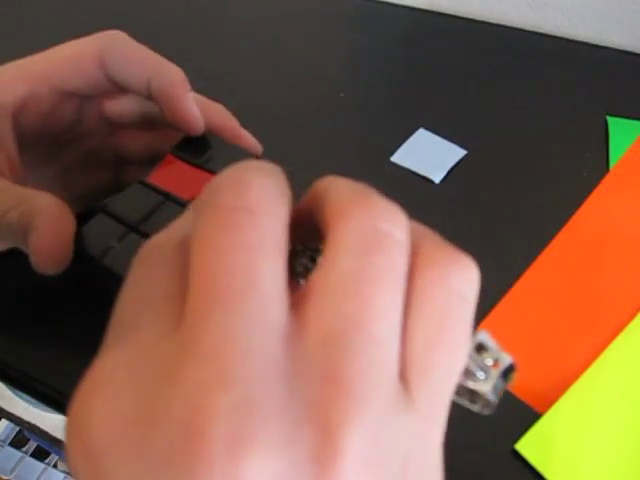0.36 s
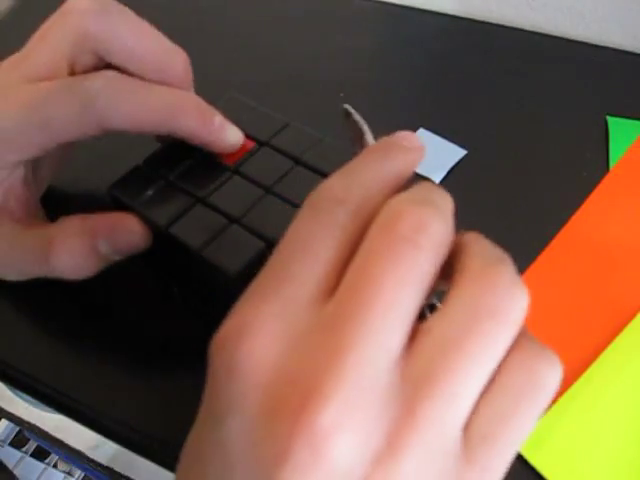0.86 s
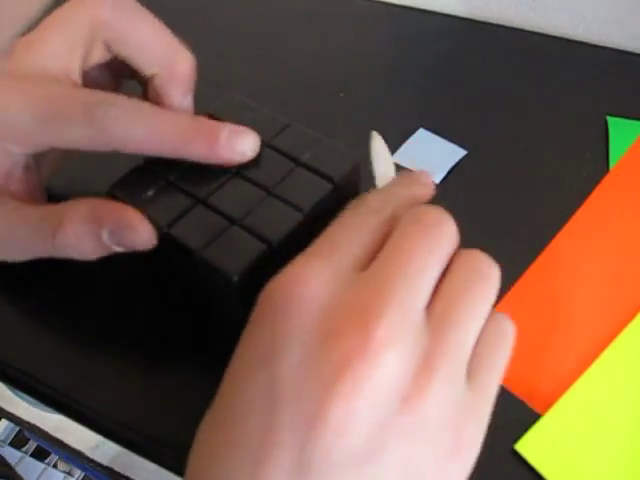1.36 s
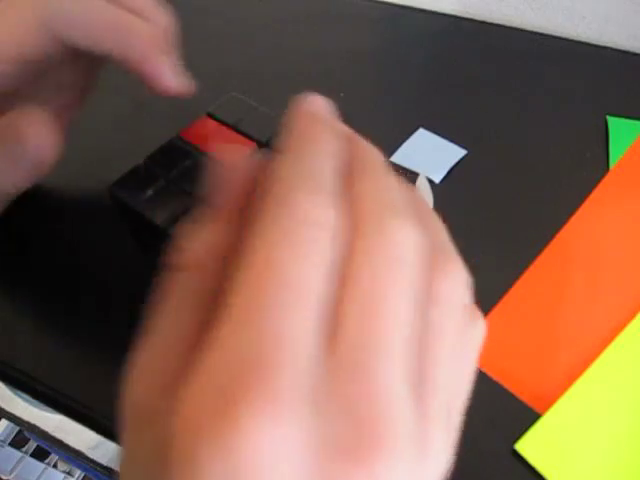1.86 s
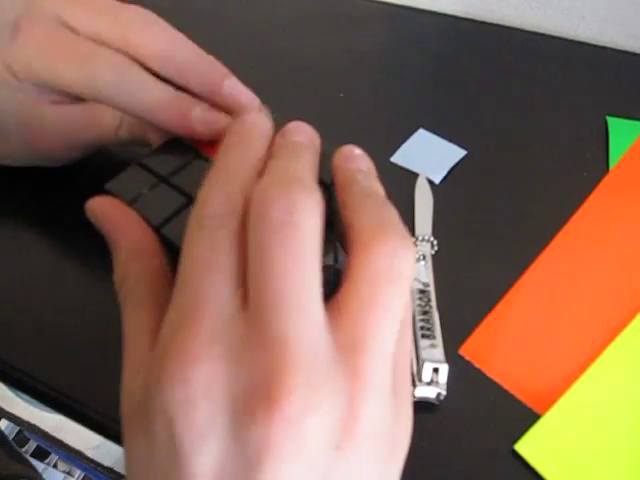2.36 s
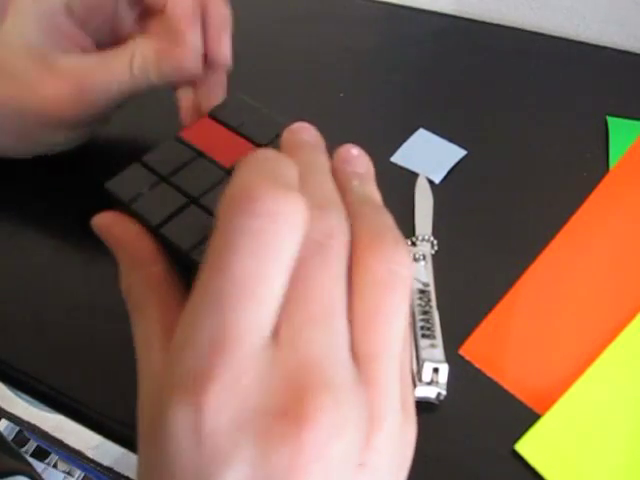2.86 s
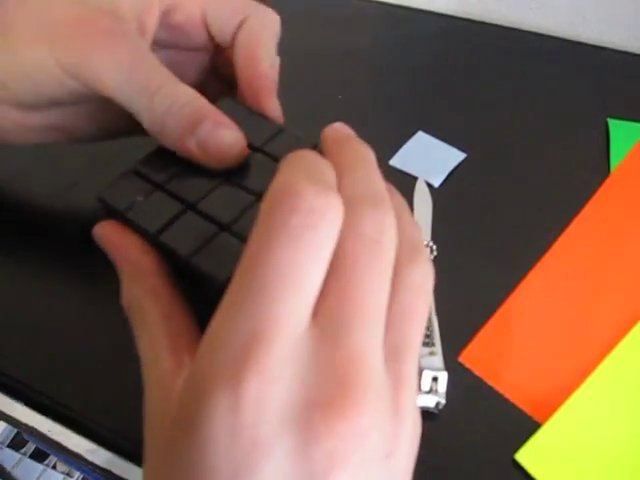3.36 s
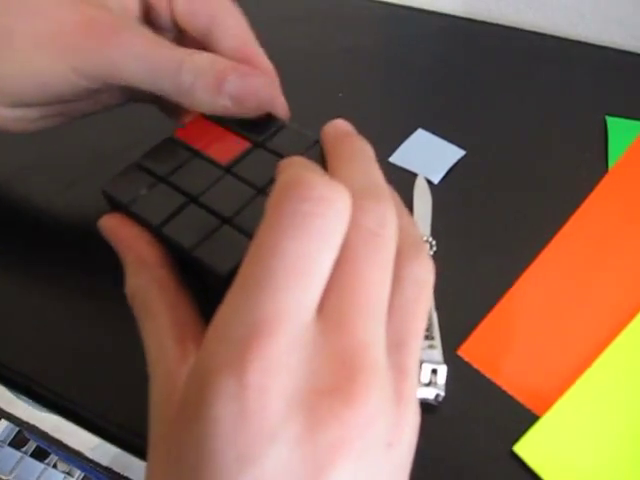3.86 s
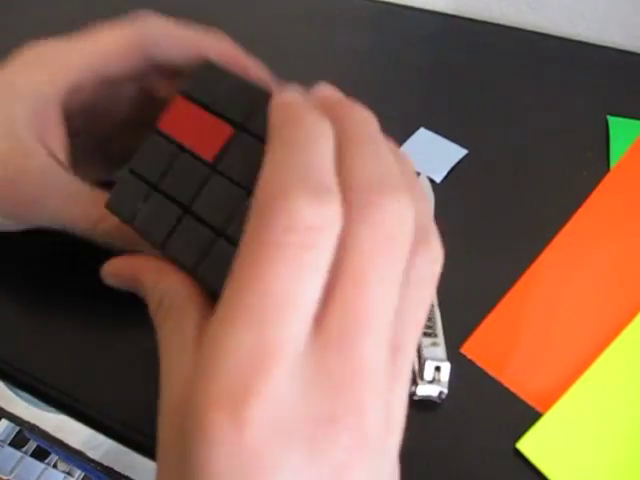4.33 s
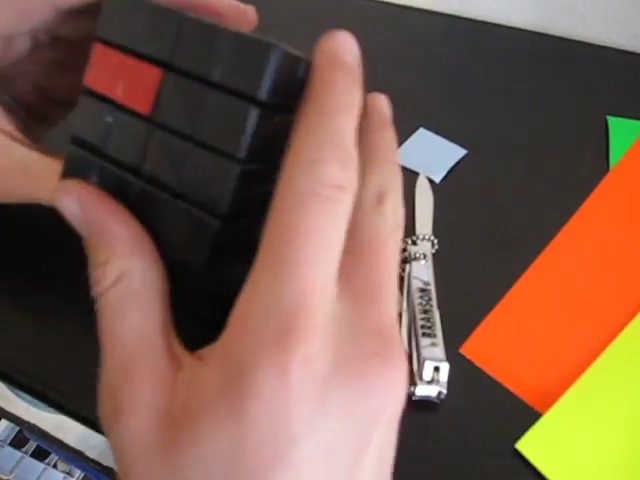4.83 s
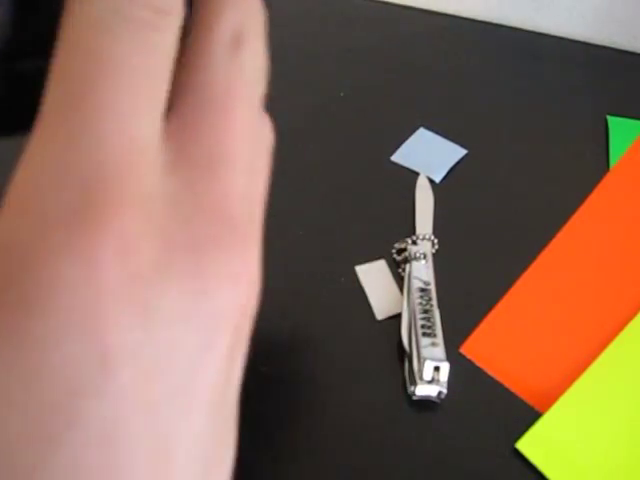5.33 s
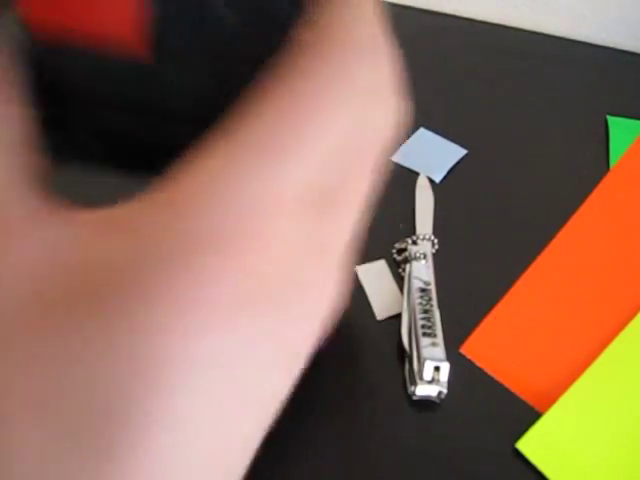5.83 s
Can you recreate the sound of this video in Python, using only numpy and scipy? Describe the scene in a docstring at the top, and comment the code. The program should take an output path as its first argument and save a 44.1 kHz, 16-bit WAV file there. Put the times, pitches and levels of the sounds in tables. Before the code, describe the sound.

A close, dry-sounding desk scene in a small room, with a steady faint hiss. From 0 to 0.7 s hands rest on a hollow plastic puzzle cube, giving only tiny ticks. Around 0.75-0.85 s a small cluster of plastic clicks and a brief scrape follow, then sparse faint touches. At 1.44 s a steel nail clipper drops on the desk with a loud, hard clack, by far the loudest event; it bounces at about 1.51 and 1.59 s, with short bright bead-chain crackle, settling by 1.75 s. From 1.85 to 2.3 s the cube drags softly. Light irregular ticks and knocks continue to about 4.2 s, with low thuds and scuffs near 3.3-3.5 s as fingers press and rub a sticker. From 3.9 to 5.2 s skin friction grows airy, stuttering briefly near 4.7 s. Then almost only hiss remains, with one barely audible touch near 5.9 s.

```python
"""First a faint hiss of room and microphone under resting hands; then a plastic puzzle cube ticks and knocks,
drags over a desk top and is rubbed by fingers that press a sticker onto it, close to a small microphone.
Once a steel nail clipper with a bead chain is dropped on the desk and bounces. Impacts and small slips
excite damped modes of desk, hollow body and hard faces; skin friction and hiss are shaped noise."""
import sys
import numpy as np
from scipy import signal
from scipy.fft import rfft, irfft
from scipy.io import wavfile
from scipy.ndimage import uniform_filter1d

SR = 44100
rng = np.random.default_rng(int(sys.argv[2]) if len(sys.argv) > 2 else 0)


def to_linear_factor(level_db):
    """Convert decibel levels (scalar or array-like) to linear amplitude factors."""
    exponent = np.asarray(level_db, float) / 20
    return 10 ** exponent


def unload_wav(signal):
    """Save mono or channel-first audio to the path in sys.argv[1] as 16-bit WAV at rate SR, clipped to [-1, 1]."""
    wavfile.write(
        sys.argv[1],
        SR,
        np.round(np.clip(np.atleast_2d(signal).T, -1, 1) * 32767).astype(np.int16),
    )


N = 262650   # length in samples


def rms_one(x):
    """Power normalisation: scales a signal to rms 1."""
    return x / np.sqrt(np.mean(x ** 2) + 1e-20)


def coloured(spectrum):
    """Spectral shaping: white noise filtered to a given power density gives steady noise, here of rms 1."""
    hz, db = np.transpose(spectrum)
    bin_hz = np.arange(N // 2 + 1) * SR / N + 1   # 1 Hz up, to keep the logarithm finite
    gain = to_linear_factor(np.interp(np.log(bin_hz), np.log(hz), db))
    return rms_one(irfft(rfft(rng.standard_normal(N)) * gain, N))


def drift(rate):
    """Slow random modulation: chance values, rate per second, joined by lines; spread 1."""
    knots = rng.standard_normal(400)
    return np.interp(np.arange(N) / SR * rate, np.arange(400), knots) * np.sqrt(3 / 2)


def band(x, low_hz, high_hz):
    """Band limitation: a second-order Butterworth band-pass."""
    return signal.sosfilt(signal.butter(2, [low_hz, high_hz], "band", fs=SR, output="sos"), x)


def evened(x, over_s):
    """Steady pressure: dividing by the short-time rms keeps the level even."""
    return x / np.sqrt(uniform_filter1d(x ** 2, int(over_s * SR)) + 1e-12)


def ring(force, hz, t60):
    """Damped resonance: a force sets one mode ringing, which falls 60 dB in t60 seconds."""
    radius = to_linear_factor(-60 / (t60 * SR))
    w = 2 * np.pi * hz / SR
    return signal.lfilter([0, np.sin(w)], [1, -2 * radius * np.cos(w), radius * radius], force + 1e-18)


def ring_all(force, modes, column):
    """Modal superposition: one force drives a whole table, at the levels of one column, signs alternating."""
    return sum((-1) ** k * to_linear_factor(mode[column]) * ring(force, mode[0], mode[-1])
               for k, mode in enumerate(modes))


def slips(per_s, size_db):
    """Friction as a Poisson-like train: random slips of either sign and uneven size."""
    sizes = to_linear_factor(size_db * np.minimum(rng.exponential(1, N), 4)) * rng.choice([-1, 1], N)
    return sizes * (rng.random(N) < per_s / SR)


def swells(rows, swell, lean):
    """Power addition of gestures: each swells and fades; one envelope per level column."""
    start, length, *levels_db = np.transpose(rows)[:, :, None]
    coarse = np.arange(0, N, 32)
    done = np.clip((coarse / SR - start) / length, 0, 1)
    shape = np.abs(np.sin(np.pi * done ** lean)) ** swell
    slow = [np.sqrt(np.sum((to_linear_factor(db) * shape) ** 2, axis=0)) for db in levels_db]
    return [np.interp(np.arange(N), coarse, envelope) for envelope in slow]


def during_clipper(t):
    """Change of source: marks the times in seconds at which the steel clipper and chain sound."""
    return (t > 1.43) & (t < 1.76)


# Hiss of room and microphone. Each row: frequency in Hz, relative density in dB per Hz.
AIR_SPECTRUM = [(15, -35), (25, -3), (91, -6), (315, -8.5), (402, 0), (460, -4), (727, -1), (1180, -9),
                (1460, -11), (2440, -12), (15700, -24)]
AIR_DB = -54.5


def air():
    """Stationary background noise: its spectrum alone gives the hiss its colour."""
    return to_linear_factor(AIR_DB) * coloured(AIR_SPECTRUM)


# Skin sliding on plastic. Each row: frequency in Hz, relative density in dB per Hz.
SKIN_SPECTRUM = [(1500, -4), (3000, 1), (5000, -1.5), (7200, 0), (11000, 1), (13500, -5.5), (15700, -15)]


def skin_hiss():
    """Sliding and stick-slip friction: a wavering fine hiss breaks into puffs while the palm stutters."""
    start_s, end_s, slips_per_s, depth_db = 4.61, 4.77, 28.0, 10.0
    t = np.arange(N) / SR
    stuttering = (t > start_s - .5 / slips_per_s) * (t < end_s)
    stuck = stuttering * np.cos(np.pi * slips_per_s * (t - start_s)) ** 4
    waver_db = 1.2 * drift(60.0)
    return to_linear_factor(waver_db - depth_db * stuck) * coloured(SKIN_SPECTRUM)


# Modes of hard faces meeting. Each row: frequency in Hz, relative level in dB, t60 in seconds.
FACE_MODES = [(3500, 23.5, 0.00074), (5270, 15, 0.0033), (5780, 12, 0.0028), (8300, 16.5, 0.00098),
              (10900, 14.5, 0.0017), (12760, 3.5, 0.0049), (14360, 0, 0.0036)]


def chain_crackle():
    """Excitation by dense small slips: the bead chain rings high modes and crackles."""
    ringing = ring_all(slips(1800.0, 2.5), FACE_MODES, column=1)
    return evened(band(ringing, 6700, 14000), 0.022)


# Strokes of skin, or of the chain. Each row: start in seconds, length in seconds, level in dB.
STROKES = [(0.15, 0.3, -66.5), (0.6, 1, -70), (1.45, 0.15, -44), (1.57, 0.088, -32.5), (1.64, 0.18, -54),
           (1.85, 0.19, -52), (2.0, 0.32, -53), (2.76, .12, -55), (2.91, 0.27, -53), (3.15, 0.37, -52),
           (3.45, 0.3, -61), (3.92, 0.25, -50.5), (4.09, .13, -45.5), (4.22, .09, -47.5), (4.3, .11, -49),
           (4.38, .82, -48.5)]
STROKE_SWELL, STROKE_LEAN = 1.15, 1   # roundness of a stroke; a lean of 1 peaks midway
RESTING_SKIN_DB = -65.5


def rub():
    """Amplitude modulation by the stroke: it swells the skin's hiss, or the falling chain's crackle."""
    stroke, = swells(STROKES, STROKE_SWELL, STROKE_LEAN)
    level = np.hypot(stroke, to_linear_factor(RESTING_SKIN_DB))
    chain = chain_crackle()
    return level * np.where(during_clipper(np.arange(N) / SR), chain, skin_hiss())


# Modes of the desk top. Each row: frequency in Hz, relative level in dB under the cube,
# relative level in dB under the clipper, t60 in seconds.
DESK_MODES = [(175, -6, -28, .04), (240, -3, -26, .04), (340, -6, -20, .03), (475, -10, -13, .045),
              (538, -6, -16, .055), (650, -7, -5, .014), (765, -5, 0, .022), (880, -4, -1, .016),
              (1017, -4, -2, .016)]
# Modes of the hollow plastic body. Each row: frequency in Hz, relative level in dB, t60 in seconds.
BODY_MODES = [(1220, 13.5, 0.0088), (1413, -4, 0.12), (1590, 10, 0.0093), (1949, 1, 0.033),
              (2140, 8, 0.0092), (2960, 5.5, 0.006)]
# Things slide on the desk. Each row: start in seconds, length in seconds, pressure thud in dB,
# desk rumble in dB, body rattle in dB.
SLIDES = [(0.74, 0.2, -57, -48, -59), (1.445, 0.17, -56, -36.5, -39), (1.57, 0.2, -58, -36.5, -38.5),
          (1.84, 0.16, -56, -40, -44.5), (2.0, 0.32, -57, -40.5, -42), (2.27, 0.33, -58, -52.5, -55),
          (2.48, 0.46, -68, -55, -56), (3.05, 0.078, -53, -50, -51.5), (3.2, 0.19, -61, -44.5, -47),
          (3.26, 0.21, -41.5, -38, -45), (3.49, 0.18, -44, -48.5, -49.5), (3.62, 0.36, -63, -53.5, -56),
          (3.97, 0.22, -57.5, -49, -51.5), (4.13, .16, -58, -52.5, -54), (4.29, 0.11, -50.5, -55, -53.5)]
SLIDE_SWELL, SLIDE_LEAN = 0.57, 0.82   # roundness of a slide; a lean under 1 peaks early
RESTING_THUD_DB, RESTING_RATTLE_DB = -60.5, -61.5   # hands that only hold the cube


def drag():
    """Friction-driven resonance: small slips ring the desk, the body and its faces; pressure thuds below."""
    press, rumble, rattle = swells(SLIDES, SLIDE_SWELL, SLIDE_LEAN)
    force = slips(500.0, 3.0)
    span_s = .04
    thud = evened(band(force, 85, 290), span_s)
    under_cube = evened(band(ring_all(force, DESK_MODES, column=1), 300, 1150), span_s)
    under_clipper = evened(band(ring_all(force, DESK_MODES, column=2), 350, 1200), span_s)
    desk = np.where(during_clipper(np.arange(N) / SR), under_clipper, under_cube)
    body = evened(band(ring_all(force, BODY_MODES, column=1), 860, 5400), span_s)
    grit = to_linear_factor(-8.5) * evened(band(ring_all(force, FACE_MODES, column=1), 1800, 8900), span_s)
    thud_level = np.hypot(press, to_linear_factor(RESTING_THUD_DB))
    rattle_level = np.hypot(rattle, to_linear_factor(RESTING_RATTLE_DB))
    return thud_level * thud + rumble * desk + rattle_level * (body + grit)


def fidgets():
    """Random arrivals: faint touches at chance moments while the hands are busy, in rows like TOUCHES."""
    count, spread_db = 24, 3.0
    s = rng.uniform(1.0, 4.5, (count, 1))
    mean_db = (-58, -52, -53)   # knock, body, tick
    return np.hstack([s, mean_db + spread_db * rng.standard_normal((count, 3))])


def blows(modes_db, hz, t60s, edges_hz, rise_s, chatter_s, settle_s, settle_db, first=0):
    """Impact excitation, a row per touch: chatter strikes every mode, loose parts settle; loudest at rms 1."""
    t = np.arange(4400) / SR
    count = len(rise_s)
    lengths = chatter_s * to_linear_factor(rng.normal(0, 1.5, (count, 1)))
    chatter = np.exp(-t / lengths) * (1 - np.exp(-t / rise_s))
    settling = to_linear_factor(settle_db) * np.exp(-t / settle_s) * (1 - np.exp(-t / chatter_s))
    force = rng.standard_normal((count, len(t))) * (chatter + settling)
    force[:, [44]] += first   # one sharp contact 1 ms in
    strengths = to_linear_factor(modes_db + 2.5 * rng.standard_normal((count, len(hz))))
    out = sum((-1) ** k * strengths[:, [k]] * ring(force, hz[k], t60s[k]) for k in range(len(hz)))
    out = band(out, *edges_hz)   # small bodies radiate little outside their modes
    power = uniform_filter1d(out ** 2, int(chatter_s * SR * 2), axis=1)
    return out / np.sqrt(power.max(axis=1, keepdims=True))


# The clear touches. Each row: time in seconds, desk knock in dB, hollow body in dB, tick in dB.
TOUCHES = [(0.152, -52, -44, -44), (0.2809, -59, -48.0, -42), (0.2892, -52.0, -50, -33.5),
           (0.447, -67, -57, -40.5), (0.4644, -46, -43.5, -35), (0.538, -47, -43.5, -40.5),
           (0.5481, -53, -42.5, -37.0), (0.7394, -54, -43, -40.5), (0.7704, -38, -31, -31),
           (0.7788, -38, -39, -32.5), (0.7895, -43, -36, -41), (0.8279, -38, -31, -37),
           (1.0634, -41, -44.5, -59), (1.1621, -43, -40.5, -41.5), (1.2834, -55, -51, -44),
           (1.3474, -50, -40, -39), (1.3806, -48, -41, -41.5), (1.4406, -10, -12.5, -17),
           (1.4845, -27, -51, -26.5), (1.5128, -14, -17.5, -31.0), (1.5416, -37, -33, -36),
           (1.583, -24.5, -33, -37), (1.5941, -21, -14, -10), (1.6115, -28, -21, -36),
           (1.6303, -21.5, -19, -43), (1.665, -25, -28.5, -46), (1.7198, -43, -39, -43),
           (1.7249, -27, -28.5, -30), (1.8502, -31, -37.5, -42), (1.8821, -28, -33, -47),
           (1.9375, -38.5, -32, -56), (1.9517, -31, -47, -41), (2.0158, -43, -36, -28),
           (2.0668, -55, -36, -42), (2.3659, -43, -44, -40), (2.437, -40, -41.5, -49),
           (2.5046, -44, -39, -35), (2.5173, -41.5, -38, -42.5), (2.5455, -38, -29.5, -32),
           (2.5595, -56, -37.5, -35), (2.641, -40, -43, -45), (2.696, -59, -38.5, -41.5),
           (2.7577, -45, -42, -47.5), (2.821, -30.5, -30.5, -28.5), (2.8272, -34, -30, -33.5),
           (2.9306, -46.5, -51, -44), (3.1561, -43, -38, -35.5), (3.2337, -56, -48, -36.5),
           (3.2423, -42, -33, -42), (3.3132, -33.5, -41, -46), (3.327, -27.5, -46, -40.5),
           (3.3395, -30.5, -45, -43), (3.3544, -30, -50, -40), (3.417, -30.5, -53, -38),
           (3.4419, -36, -42.5, -40.5), (3.5052, -44, -46, -41.5), (3.5283, -39, -43, -39.5),
           (3.5601, -36, -37, -38.5), (3.5975, -35, -44, -39), (3.6291, -55, -30.5, -26),
           (3.7119, -52, -39, -36.5), (3.724, -41, -44, -52), (3.7583, -38, -41.5, -38.5),
           (3.7812, -44, -45, -41.5), (3.8424, -39, -32.5, -44.5), (3.888, -42, -45, -52),
           (3.9871, -41, -41, -41.5), (4.046, -35, -32.5, -32), (4.053, -36, -37, -33.5),
           (4.0716, -46, -38, -35), (4.1634, -45, -47, -36), (4.1788, -36, -37.5, -39),
           (4.308, -39, -48, -50), (4.3292, -35, -41, -47), (4.3939, -57, -40.5, -51),
           (4.494, -54, -51, -45), (4.7235, -44.5, -42.5, -42.5), (4.7665, -44, -63, -45),
           (4.9181, -46, -37.5, -35.5), (5.8806, -56, -47.5, -60)]
# The more the body outweighs the desk, the higher the desk modes struck under the cube.
KNOCK_TILT = 0.37        # dB per octave per dB
KNOCK_EVEN_DB = -15.5    # body-over-desk level at which there is no tilt
FIRST_CONTACT_DB = 15.5  # single sharp first contact of steel, over the chatter


def touches():
    """Modal impact: each touch is a knock in the desk, a clack of the body and a tick of the faces."""
    s, knock_db, body_db, tick_db = np.vstack([TOUCHES, fidgets()]).T[:, :, None]
    steel = during_clipper(s)
    rise_s = np.where(steel, .0002, .001)   # steel meets the desk more abruptly than plastic in a hand
    first = steel * to_linear_factor(FIRST_CONTACT_DB)

    hz, cube_db, clipper_db, t60 = np.transpose(DESK_MODES)
    tilt_db = np.clip(KNOCK_TILT * (body_db - knock_db - KNOCK_EVEN_DB), -2.0, 6.0)
    cube_db = cube_db + tilt_db * np.log2(hz / hz[0])
    desk_db = np.where(steel, clipper_db, cube_db)
    rows = to_linear_factor(knock_db) * blows(desk_db, hz, t60, (140, 1500), rise_s, chatter_s=.002,
                                 settle_s=.02, settle_db=-21, first=first)
    hz, db, t60 = np.transpose(BODY_MODES)
    rows += to_linear_factor(body_db) * blows(db, hz, t60, (900, 4000), rise_s, chatter_s=.0012,
                                 settle_s=.011, settle_db=-11.0, first=first)
    hz, db, t60 = np.transpose(FACE_MODES)
    rows += to_linear_factor(tick_db) * blows(db, hz, t60, (3000, 16000), np.full_like(s, .001), chatter_s=.0015,
                                 settle_s=.0047, settle_db=-12.0)

    out = np.zeros(N + rows.shape[1])
    starts = np.round((s[:, 0] - .001) * SR).astype(int)   # each row begins 1 ms ahead of its touch
    for at, row in zip(starts, rows):
        out[at:at + len(row)] += row
    return out[:N]


def room(x, t60_s, dull_hz):
    """Diffuse reverberation: near walls answer with a short decaying noise tail."""
    t = np.arange(int(.3 * SR)) / SR
    tail = rng.standard_normal(len(t)) * to_linear_factor(-60 * t / t60_s) * (t > .004)
    tail = signal.lfilter(*signal.butter(1, dull_hz, fs=SR), tail)
    return signal.fftconvolve(x, tail / np.sqrt(np.sum(tail ** 2)))[:N]


def scene():
    """Superposition: hands, cube and clipper over the hiss of the room."""
    near = touches() + drag()
    wet = to_linear_factor(-15.5) * room(near, t60_s=0.32, dull_hz=6550)
    return (near + wet + rub() + air())[None]


def roll_off(x):
    """The treble ends steeply here."""
    return signal.sosfilt(signal.butter(12, 17000, fs=SR, output="sos"), x)


def record(dry):
    """Saturation and band limitation: peaks are slightly rounded and the top is cut."""
    rounded = 0.91 * np.tanh(dry / 1.022)
    top_cut = signal.cheby2(10, 40, 16300, fs=SR, output="sos")
    return roll_off(signal.sosfilt(top_cut, rounded))


dry = scene()
out = record(dry)
unload_wav(out)
```